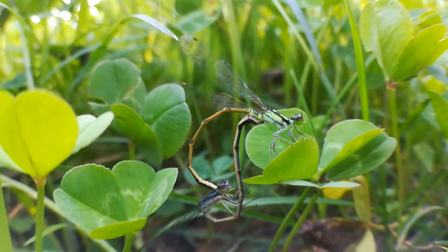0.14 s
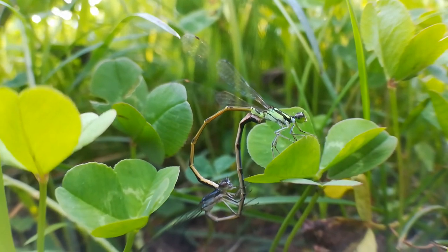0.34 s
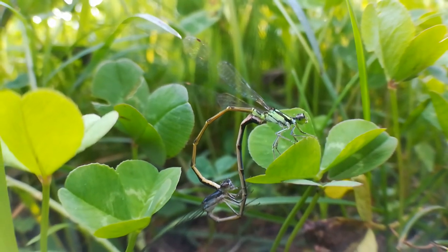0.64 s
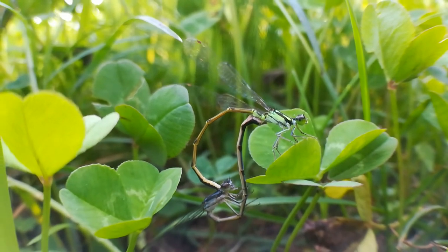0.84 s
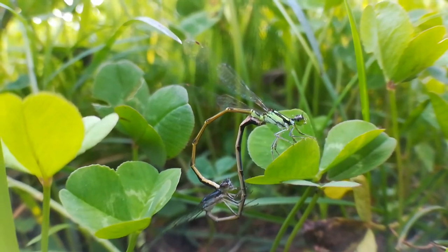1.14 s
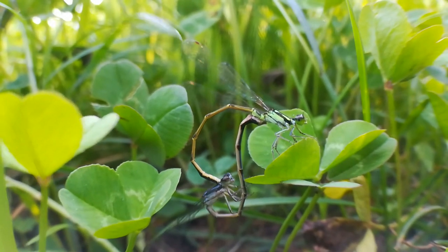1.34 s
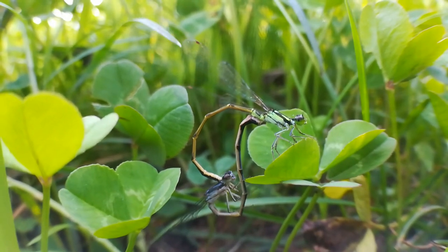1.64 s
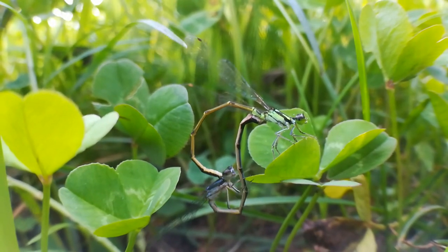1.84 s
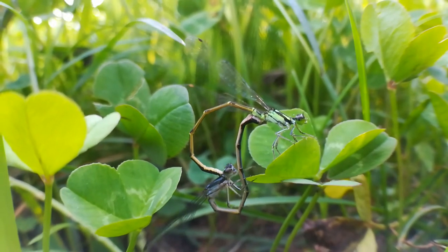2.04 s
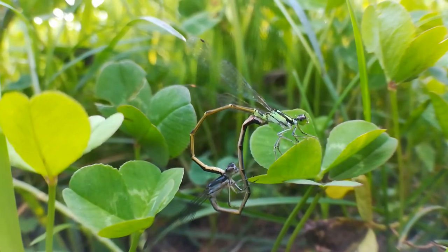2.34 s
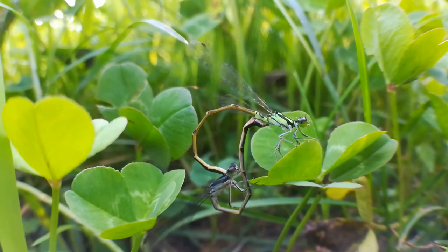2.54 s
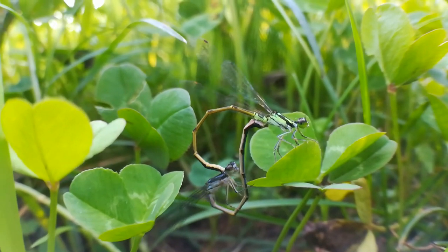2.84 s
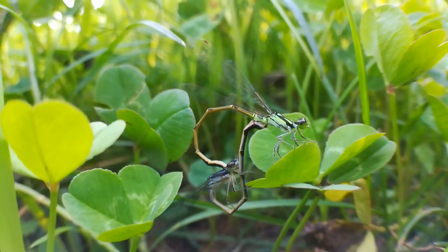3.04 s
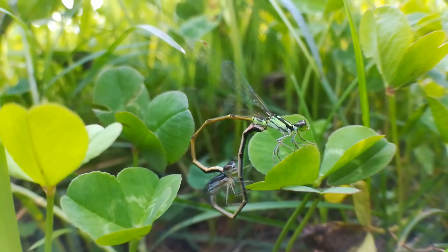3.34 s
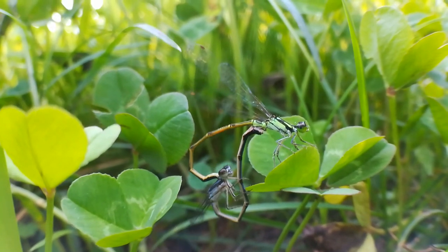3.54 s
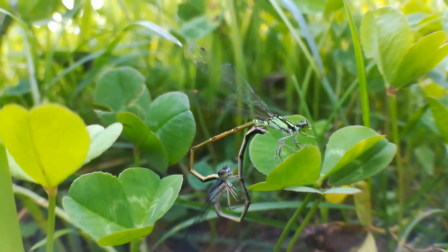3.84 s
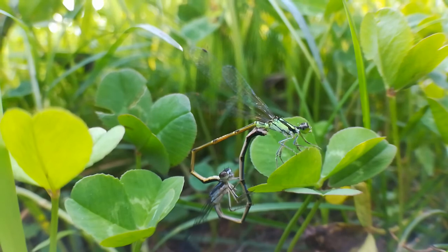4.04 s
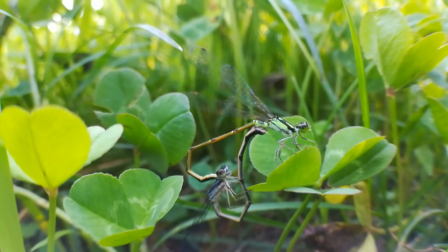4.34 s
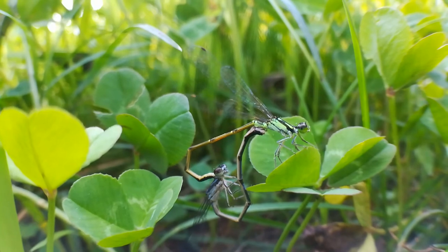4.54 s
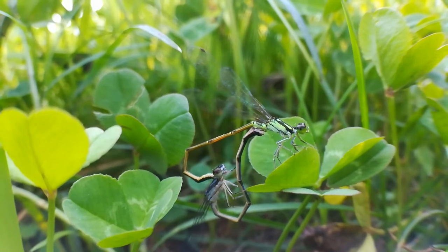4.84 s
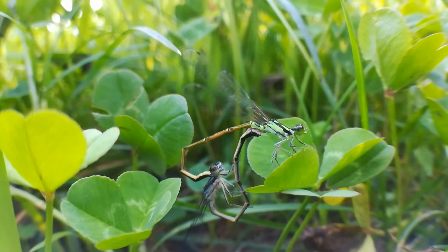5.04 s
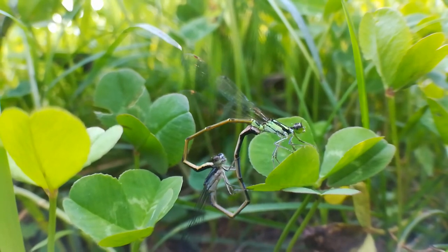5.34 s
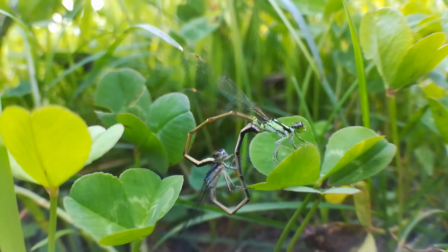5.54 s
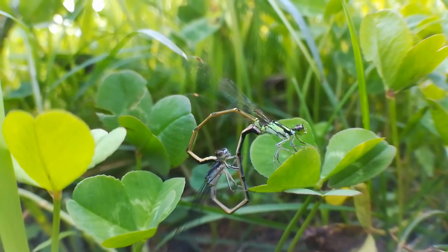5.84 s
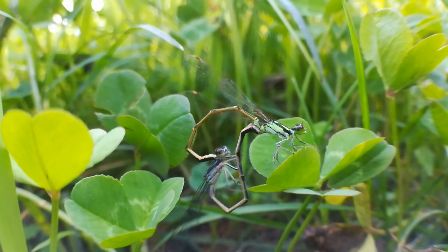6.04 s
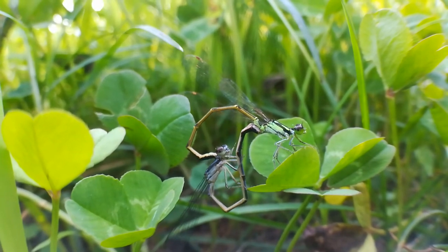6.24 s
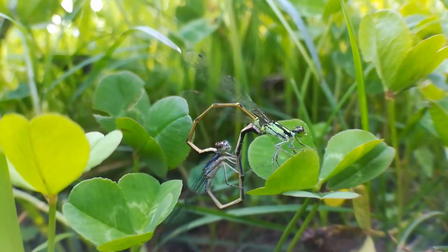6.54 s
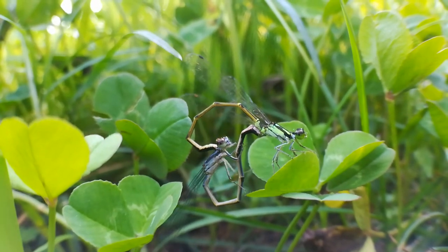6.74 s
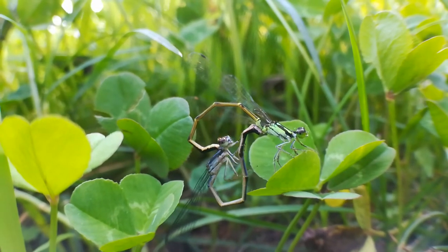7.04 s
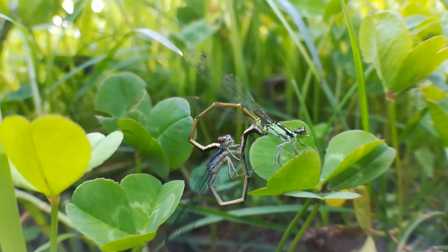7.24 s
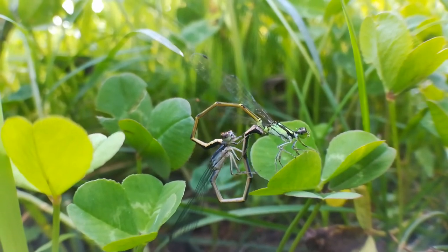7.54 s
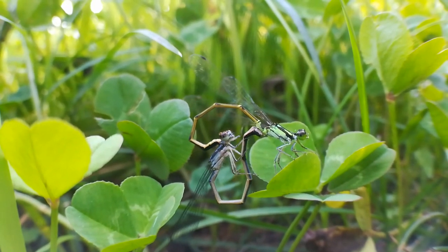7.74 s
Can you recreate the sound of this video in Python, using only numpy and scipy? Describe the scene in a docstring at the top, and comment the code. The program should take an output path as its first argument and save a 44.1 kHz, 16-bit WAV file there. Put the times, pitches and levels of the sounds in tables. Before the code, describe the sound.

A quiet grassy place, heard through one microphone with soft, limited top treble. A low rumble, a gently swelling deep drone and a fine, high insect hiss last all eight seconds. Faint hoarse bird calls, blurred by distance, start at 0.2 s, with a clear falling whistle near 0.7 s. At 1.1 s a cricket gives three quick, slowing pips, then two weaker ones at 2.7 s. From 3.3 to 5.4 s a far insect buzzes faintly, slowly growing. At 3.6 s a small bird loudly whistles a sinking high note, then softer lower notes at 4.0 and 4.2 s, and a high, rising, strongly throbbing note at 4.5 s, ending by 4.75 s with a brief leafy tail. Another far whistle falls at 4.9 s. Faint cricket pips follow around 5.2, 6.3 and 7.8 s, among scattered hoarse calls and a last distant whistle near 7.6 s.

```python
"""A low outdoor rumble with a swelling drone and the hiss of an insect chorus, both filtered noise, last throughout.
Far birds call from the start: hoarse calls are frequency-modulated tones, clear ones falling whistles.
From one second a cricket gives short groups of pips, swelling sine bursts; later a far insect buzzes
for two seconds as band noise. Soon after the buzz begins, a small bird whistles one four-note phrase
(high, low, low, high) of gliding, throbbing sines, scattered by foliage as sparse dying echoes."""
import sys
import numpy as np
from scipy import signal
from scipy.fft import rfft, irfft
from scipy.io import wavfile
from scipy.ndimage import uniform_filter1d

SR = 44100
rng = np.random.default_rng(int(sys.argv[2]) if len(sys.argv) > 2 else 0)


def generate_wav(signal):
    """Clip the signal to [-1, 1] and save it as 16-bit WAV at the path in sys.argv[1]."""
    frames = np.transpose(np.atleast_2d(signal))
    scaled = np.clip(frames, -1, 1) * 32767
    pcm = np.round(scaled).astype(np.int16)
    wavfile.write(sys.argv[1], SR, pcm)


N = 347508
TIME = np.arange(N) / SR  # s


def gain_of(db):
    """Logarithmic level: decibels to an amplitude ratio."""
    return 10 ** (np.asarray(db) / 20)


def evened(x):
    """Normalisation: scales to an rms of one."""
    return x / np.sqrt(np.mean(x ** 2) + 1e-30)


def level(curve):
    """Envelope: gain at every sample, interpolated in decibels from rows of (s, dB)."""
    return gain_of(np.interp(TIME, *np.transpose(curve)))


def add(mix, start_s, sound):
    """Superposition: adds a sound into the mix from its start time."""
    part = mix[max(round(start_s * SR), 0):][:len(sound)]
    part += sound[:len(part)]


def noise(points):
    """Spectral shaping: unit noise through (Hz, dB) points, falling 20 dB per octave faster outside them."""
    hz, db = np.transpose(points)
    octave = np.log2(np.fft.rfftfreq(N, 1 / SR) + 1)
    known = np.log2(hz + 1)
    outside = abs(octave - np.clip(octave, known[0], known[-1]))
    gain = gain_of(np.interp(octave, known, db) - 20 * outside)
    return evened(np.fft.irfft(rfft(rng.standard_normal(N)) * gain, N))


def wander(size, rate_hz):
    """Low-passed randomness: unit fluctuation that moves up to about the given rate."""
    span = max(size, SR)
    smooth = np.exp(-.5 * (np.fft.rfftfreq(span, 1 / SR) / rate_hz) ** 2)
    return evened(irfft(rfft(rng.standard_normal(span)) * smooth, span))[:size]


def tone(hz):
    """Phase accumulation: a sine that follows a pitch curve."""
    return np.sin(2 * np.pi * np.cumsum(hz) / SR)


def ramp(t, length, rise_s, fall_s):
    """Linear envelope: straight attack, hold and release, between 0 and 1."""
    return np.clip(np.minimum(t / rise_s, (length - t) / fall_s), 0, 1)


def foliage(x, t60, wet_db):
    """Multiple scattering: leaves and trunks return many small echoes that decay by 60 dB in t60 seconds."""
    t = np.arange(SR) / SR
    # about 2000 echoes a second, of random sign, after the first 8 ms
    taps = rng.choice([-1., 1.], SR) * (rng.random(SR) < 2000 / SR) * (t > .008)
    taps = taps * gain_of(-60 * t / t60)
    echoes = signal.fftconvolve(x, taps / np.linalg.norm(taps))[:len(x)]
    return x + gain_of(wet_db) * echoes


# Spectrum of the low outdoor noise. Each row: frequency in Hz, relative density in dB per Hz.
RUMBLE_SPECTRUM = [(8.8, -41), (15, -10), (32, 1), (91, -3.5), (163, -11.5), (279, -16), (461, -25),
                   (761, -28), (858, -26.5), (1390, -37), (1800, -43.5), (2340, -72), (3960, -120)]


def rumble(bed_db=-61.7, ease_db=4.5):
    """Broadband low-frequency noise: a steady bed whose upper bass eases by ease_db from start to end."""
    bed = noise(RUMBLE_SPECTRUM) * gain_of(bed_db)
    upper_bass_filter = signal.butter(2, [120, 300], "bandpass", fs=SR, output="sos")
    upper = signal.sosfiltfilt(upper_bass_filter, bed)
    easing = gain_of(ease_db * (.5 - TIME / TIME[-1]))
    return (bed - upper) + upper * easing


# Loudness of a deep drone, as of far traffic. Each row: time in seconds, level in dB before the trim trim_db.
DRONE_CURVE = [(0.0, -60.5), (0.66, -63.5), (0.7, -52.5), (0.85, -66), (2.46, -64.5), (2.72, -56.5),
               (2.76, -64.5), (4.72, -64), (4.83, -64.5), (4.87, -52), (5.05, -66), (5.09, -55.5),
               (5.2, -60), (5.29, -53), (5.33, -69), (5.53, -59), (6.43, -67), (7.88, -67)]


def drone(trim_db=-3.2):
    """Narrow-band noise: a band near 90 Hz, heard as a deep drone, follows a swelling envelope."""
    band = noise([(65, -19.5), (82, -2.5), (93, 3.5), (115, -18.5)])
    return gain_of(trim_db) * band * level(DRONE_CURVE)


def patchy(x, patch_db):
    """Band-wise modulation: narrow bands swell and sink on their own, over about a tenth of a second."""
    z = signal.stft(x, nperseg=1024, noverlap=768)[2].T
    patches = uniform_filter1d(rng.standard_normal(z.shape), 17, 0)  # smooth over frames
    patches = evened(uniform_filter1d(patches, 5, 1))  # smooth over frequency bins
    z = z * gain_of(patch_db * patches)
    return evened(signal.istft(z.T, nperseg=1024, noverlap=768)[1][:N])


CHORUS_DB, CHORUS_DB_PER_S = -62, -.15  # level at the start, and its slow drift
# Spectrum of the insect hiss. Each row: frequency in Hz, relative density in dB per Hz.
CHORUS_SPECTRUM = [(1800, -26.5), (2900, -23.5), (3400, -12.5), (4000, -6.5), (4600, -3.5), (5300, 1),
                   (6200, -1), (7200, -6), (7290, -20.5), (8200, -33.5), (9000, -39.5)]


def insect_chorus(flutter_db=.5, flutter_hz=25):
    """Incoherent summation: countless far insects merge into a high hiss, modelled as patchy noise."""
    chorus = patchy(noise(CHORUS_SPECTRUM), patch_db=2.03)
    chorus = chorus * gain_of(CHORUS_DB + CHORUS_DB_PER_S * TIME)
    return chorus * gain_of(flutter_db * wander(N, flutter_hz))


def far_call(length, pitch_hz, fall, rough, rasp_hz=130, waver=0.0057):
    """Frequency modulation: one sinking call; when hoarse, an uneven flutter splits the tone into side tones."""
    size, rough = int(length * SR), np.clip(rough, 0, 1)
    glide = 1 + fall * np.linspace(.5, -.5, size)
    hz = pitch_hz * glide * (1 + waver * wander(size, 46))
    flutter = tone(rasp_hz * (1 + 0.076 * wander(size, 30)))
    voice = tone(hz * (1 + 0.1 * rough * flutter))
    voice = voice * (1 + 0.9 * rough * wander(size, 280))
    return evened(voice * signal.windows.tukey(size, .6))


HOARSE_FALL = .025  # share of the pitch lost over a hoarse call
WHISTLE_ROUGH = .18  # roughness of a clear whistle, 0-1
# Hoarse calls. Each row: start in seconds, length in seconds, mid pitch in Hz,
# level in dB before the trim far_db and the echoes, roughness from 0 to 1.
HOARSE_CALL_ROWS = [(.195, 0.2, 2280, -77, .5), (.451, 0.21, 2200, -83.5, .8),
                    (.795, .11, 2435, -80.5, .25), (.893, .05, 2080, -84, .2), (1.048, .1, 2550, -82.5, .3),
                    (2.77, .17, 2313, -82.5, 1), (3.04, .07, 2480, -81.5, .5), (3.385, 0.12, 2350, -81, .8),
                    (3.701, 0.082, 2100, -78, .6), (5.055, .07, 2060, -77.5, .35),
                    (5.585, .095, 2340, -77.5, .6), (5.87, 0.19, 2418, -76.5, .7),
                    (6.329, 0.15, 2490, -79.5, .65), (6.611, 0.18, 2416, -83.5, .35),
                    (7.63, .09, 2140, -85, .15), (7.794, 0.09, 2420, -78.5, .5)]
# Clear falling whistles. Each row: start in seconds, length in seconds, mid pitch in Hz,
# level in dB before the trim far_db and the echoes, share of the pitch lost.
FAR_WHISTLE_ROWS = [(.683, .17, 3270, -74.5, .11), (4.87, .17, 3244, -66, .045),
                    (7.551, 0.13, 2843, -79.5, .01)]


def far_birds(far_db=-2.6, wet_db=-5):
    """Reverberant blurring: scattered echoes smear faint hoarse calls and falling whistles."""
    out = np.zeros(N)
    for start_s, length, hz, db, rough in HOARSE_CALL_ROWS:
        add(out, start_s, gain_of(db + far_db) * far_call(length, hz, HOARSE_FALL, rough))
    for start_s, length, hz, db, fall in FAR_WHISTLE_ROWS:
        add(out, start_s, gain_of(db + far_db) * far_call(length, hz, fall, WHISTLE_ROUGH))
    return foliage(out, t60=0.46, wet_db=wet_db)


PIP_SLOWING, PIP_FADE_DB = 1.245, -3  # each gap is longer and each pip weaker than the last
# chirps fainter than NEAR_DB come from farther off, and their pips are drawn out
PIP_S, SMEAR_S_PER_DB, NEAR_DB = .021, .0012, -46
# Cricket chirps. Each row: start in seconds, number of pips, first gap from onset to onset in seconds,
# peak level of the first pip in dB before the echoes, mid pitch in Hz.
CHIRP_ROWS = [(1.060, 3, .090, -45, 3593), (2.689, 2, 0.095, -51, 3587), (3.7044, 1, 0, -48.5, 3605),
              (4.4997, 1, 0, -49.5, 3605), (5.192, 2, .105, -55, 3627), (6.266, 2, .062, -64.5, 3650),
              (6.38, 3, .046, -59, 3610), (7.84, 1, 0, -63, 3590)]


def cricket(sag=0.0076, wet_db=-8.5):
    """Stridulation: each wing stroke rings one swelling pip that sags in pitch; a chirp slows and fades."""
    out = np.zeros(N)
    for start_s, count, gap_s, db, hz in CHIRP_ROWS:
        pip_s = PIP_S + SMEAR_S_PER_DB * max(NEAR_DB - db, 0)
        u = np.linspace(0, 1, int(pip_s * SR))  # progress through the pip
        pip = np.sin(np.pi * u) * tone(hz * (1 + sag * (.5 - u)))
        for k in range(round(count)):
            add(out, start_s, gain_of(db + k * PIP_FADE_DB) * pip)
            start_s = start_s + gap_s * PIP_SLOWING ** k
    return foliage(out, t60=0.42, wet_db=wet_db)


BUZZ_START_S, BUZZ_END_S, BUZZ_EDGE_S = 3.34, 5.43, .035
BUZZ_DB, BUZZ_DB_PER_S = -74.5, 1.1  # level at its start, and its growth
# Spectrum of the far buzzing insect. Each row: frequency in Hz, relative density in dB per Hz.
BUZZ_SPECTRUM = [(1500, -28.5), (2000, -10.5), (2400, -2.5), (3000, -4), (3600, 2.5), (4500, -16)]


def insect_buzz():
    """Gated band noise: one buzz, lower than the chorus, starts, grows and stops."""
    t = TIME - BUZZ_START_S
    gate = ramp(t, BUZZ_END_S - BUZZ_START_S, BUZZ_EDGE_S, BUZZ_EDGE_S)
    return noise(BUZZ_SPECTRUM) * gate * gain_of(BUZZ_DB + BUZZ_DB_PER_S * t)


ATTACK_S, SOFT_START_DB = .028, -16  # a note opens below its full strength, then swells
SETTLE_S, LEAVE_S = .038, .026  # time constants of the slides onto and off the held pitch
TREMBLE, TREMBLE_HZ = .0021, 260  # quick unsteadiness of the pitch: share, rate
FLUTTER, FLUTTER_HZ = .08, 120  # quick flutter of loudness: share, rate


def note(length, swell_s, release_s, entry_hz, held_hz, exit_hz, sag):
    """Exponential glide: a nearly pure whistle swells and dies, sliding onto and off a drifting pitch."""
    t = np.arange(int(length * SR)) / SR
    hz = held_hz + sag * (length / 2 - t)
    slide_on = (entry_hz - hz) * np.exp(-t / SETTLE_S)
    slide_off = (exit_hz - hz) * np.exp((t - length) / LEAVE_S)
    hz = hz + slide_on + slide_off
    swell = gain_of(np.interp(t, [0, swell_s], [SOFT_START_DB, 0]))
    effort = ramp(t, length, ATTACK_S, release_s) * swell
    whistle = np.sqrt(2) * tone(hz * (1 + TREMBLE * wander(len(t), TREMBLE_HZ)))
    return effort * (1 + FLUTTER * wander(len(t), FLUTTER_HZ)) * whistle


THROB_HZ, THROB_UNEVEN = 23.8, .3  # rate of the throb, and scatter of its depth as a share
# Whistled notes, with a tiny flick before the last. Each row: start in seconds, length in seconds,
# swell in seconds, release in seconds, level in dB before the throb, entry pitch in Hz,
# held pitch at mid note in Hz, exit pitch in Hz, sag in Hz per second (negative rises), throb depth from 0 to 1.
NOTE_ROWS = [(3.622, .264, .225, .035, -23, 4850, 4632, 4540, 480, .5),
             (3.977, .19, 0.096, .09, -31, 3455, 3576, 3570, 0, .4),
             (4.172, .254, .09, .035, -38.3, 3520, 3492, 3390, 100, .25),
             (4.47, .04, .004, .02, -45.5, 5290, 5250, 5130, 0, 0.12),
             (4.488, .249, 0.061, .04, -28, 4915, 5002, 4975, -300, .72)]


def songbird(wet_db=-10):
    """Energy spreading: foliage shares each note's energy with a short tail; both throb unevenly."""
    out, t = np.zeros(N), np.arange(SR) / SR
    for start_s, length, swell_s, release_s, db, entry_hz, held_hz, exit_hz, sag, depth in NOTE_ROWS:
        direct = note(length, swell_s, release_s, entry_hz, held_hz, exit_hz, sag)
        heard = foliage(np.pad(direct, (0, SR - len(direct))), t60=.23, wet_db=wet_db)
        heard = heard * np.linalg.norm(direct) / np.linalg.norm(heard)  # same energy as the direct note
        dip = np.clip(depth * (1 + THROB_UNEVEN * wander(SR, THROB_HZ)), 0, 1)
        throb = 1 - dip * (1 - abs(np.sin(np.pi * THROB_HZ * (length - t))))
        add(out, start_s, gain_of(db) * throb * heard)
    return out


def scene():
    """Superposition: all sources add at one microphone."""
    steady = rumble() + drone() + insect_chorus()
    animals = far_birds() + cricket() + insect_buzz() + songbird()
    return (steady + animals)[None]


EDGE_HZ = 8900  # upper band limit


def record(dry):
    """Low-pass filtering: the recorder's band limit removes the top treble."""
    low_pass = signal.firwin(511, EDGE_HZ, window=("kaiser", 9), fs=SR)
    return signal.oaconvolve(dry, low_pass[None], "same")


dry = scene()
out = record(dry)
generate_wav(out)
```